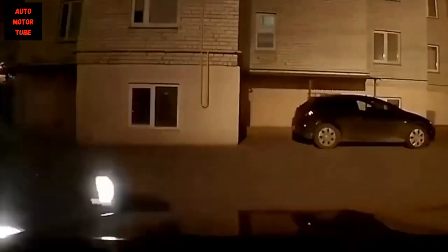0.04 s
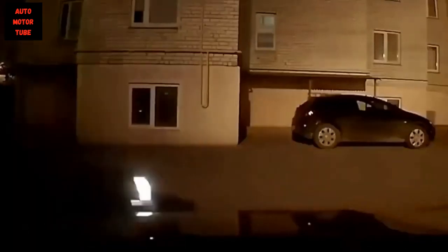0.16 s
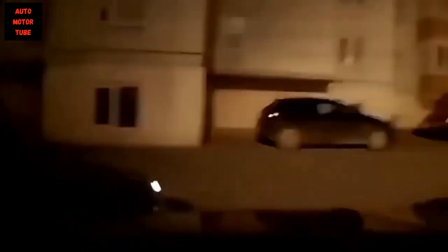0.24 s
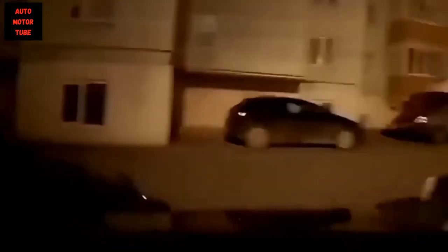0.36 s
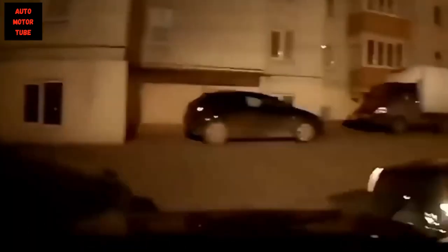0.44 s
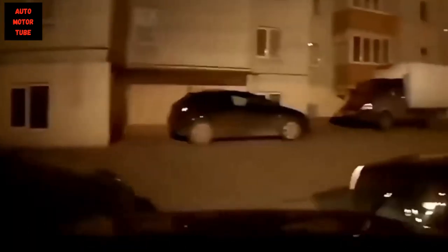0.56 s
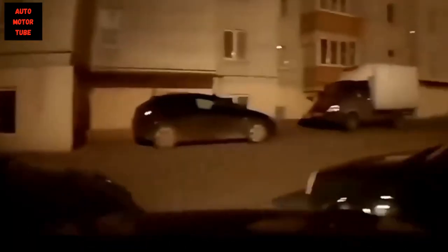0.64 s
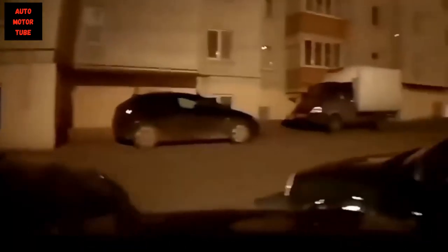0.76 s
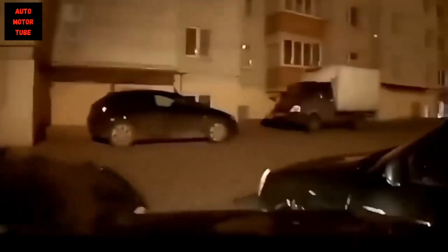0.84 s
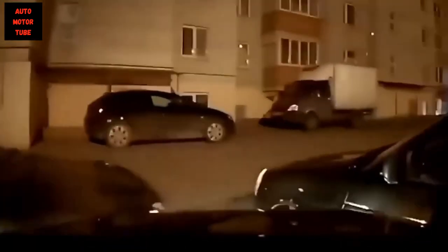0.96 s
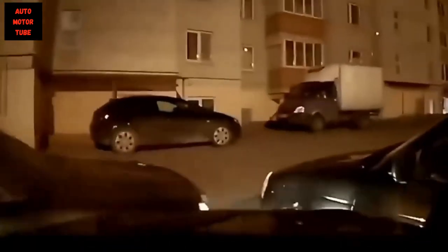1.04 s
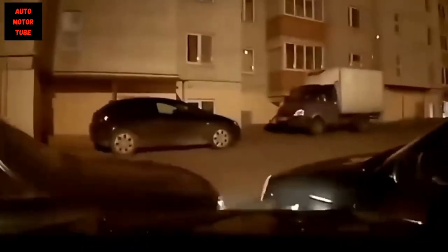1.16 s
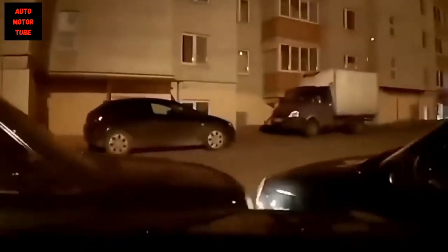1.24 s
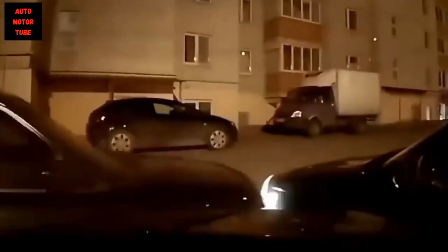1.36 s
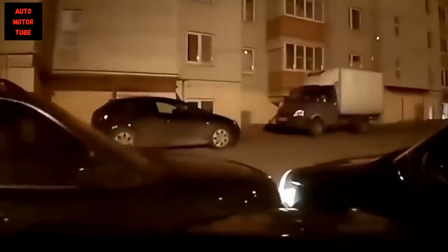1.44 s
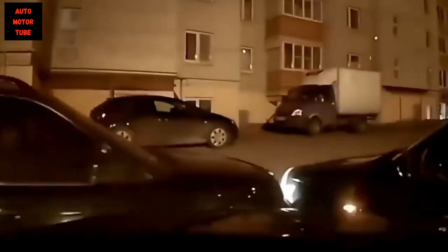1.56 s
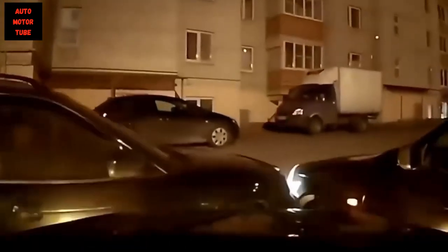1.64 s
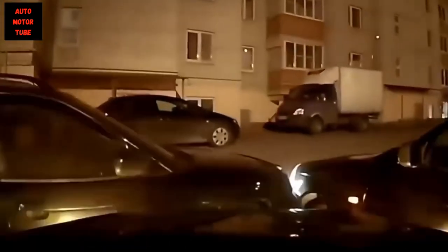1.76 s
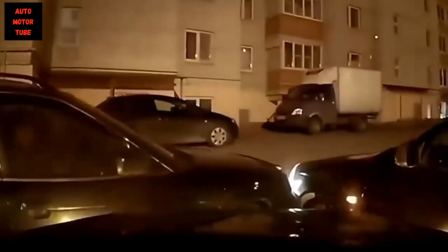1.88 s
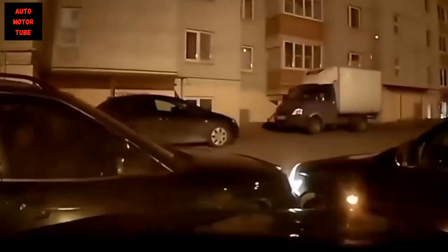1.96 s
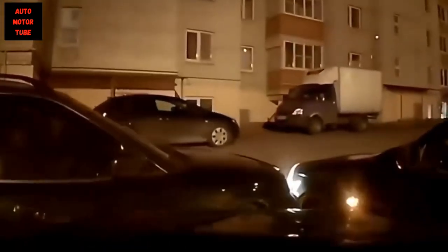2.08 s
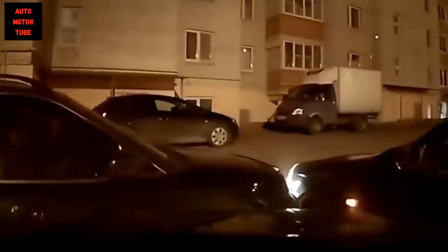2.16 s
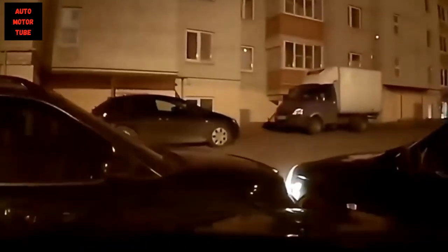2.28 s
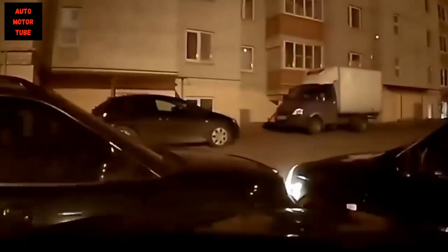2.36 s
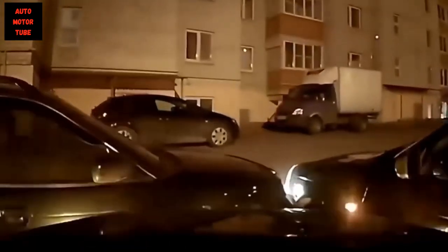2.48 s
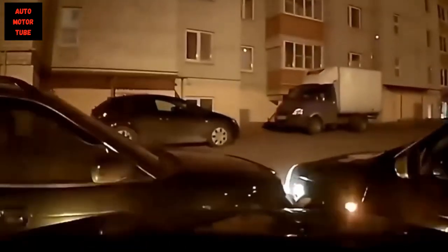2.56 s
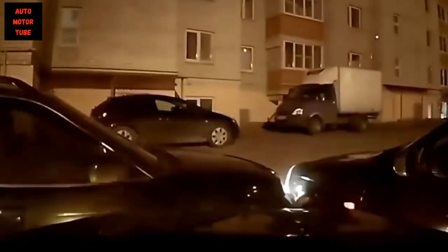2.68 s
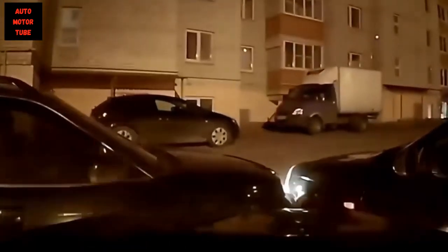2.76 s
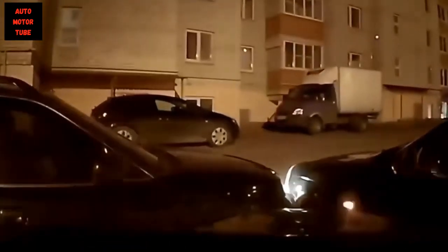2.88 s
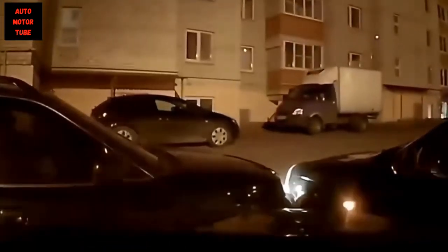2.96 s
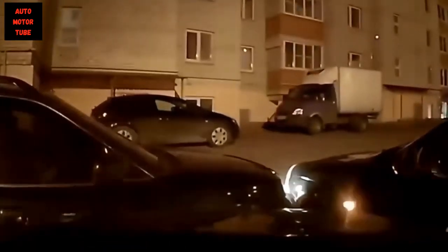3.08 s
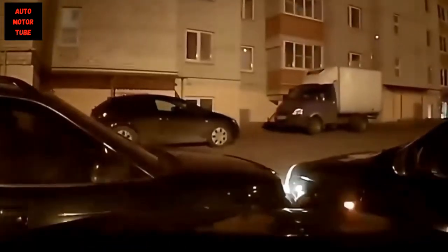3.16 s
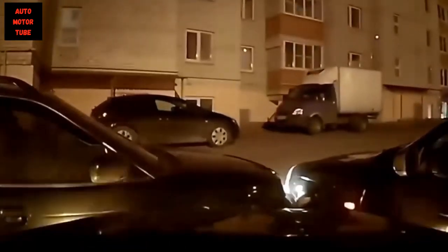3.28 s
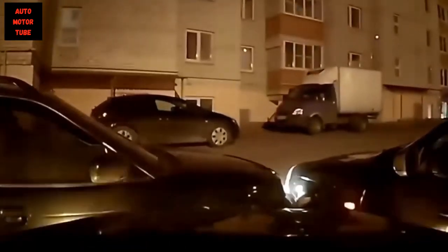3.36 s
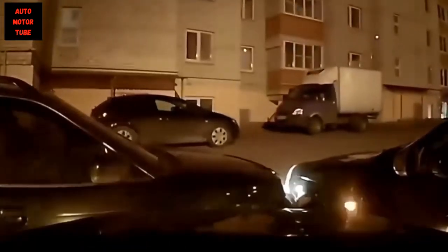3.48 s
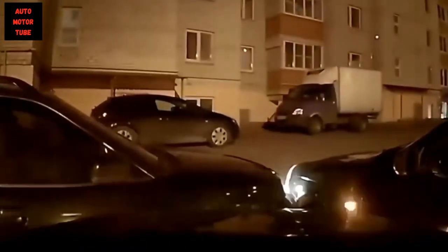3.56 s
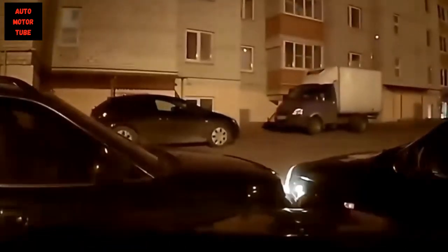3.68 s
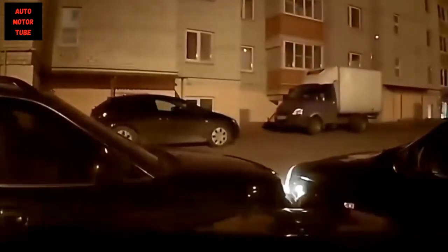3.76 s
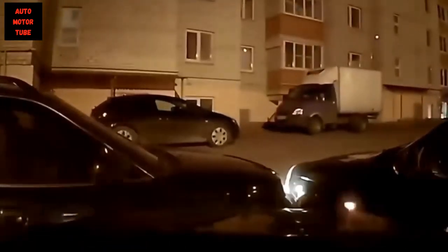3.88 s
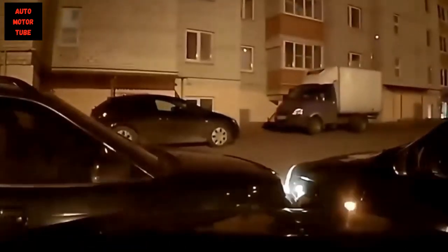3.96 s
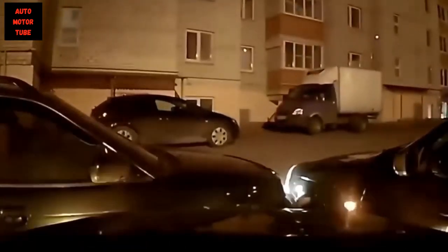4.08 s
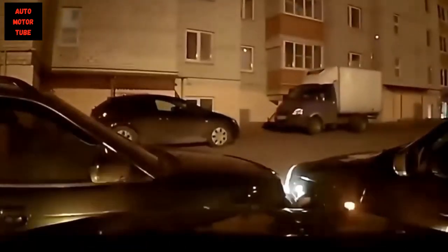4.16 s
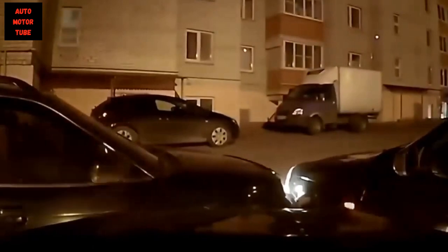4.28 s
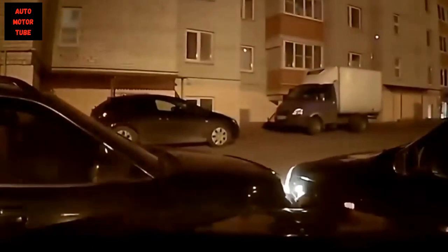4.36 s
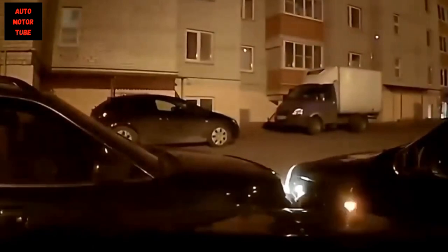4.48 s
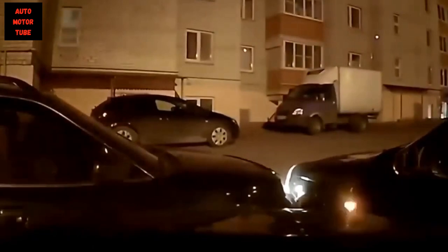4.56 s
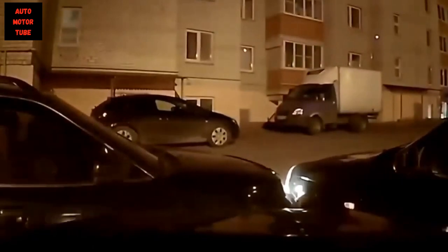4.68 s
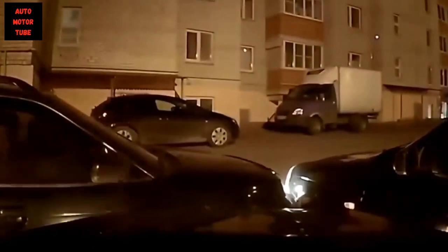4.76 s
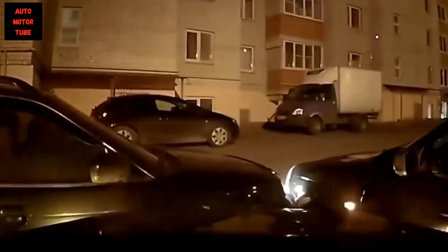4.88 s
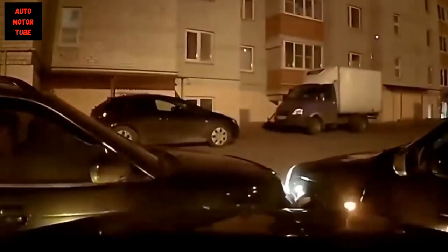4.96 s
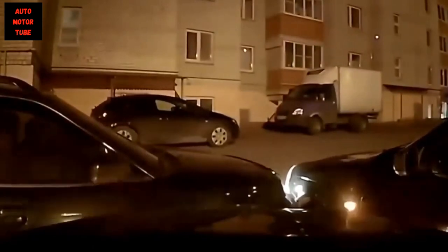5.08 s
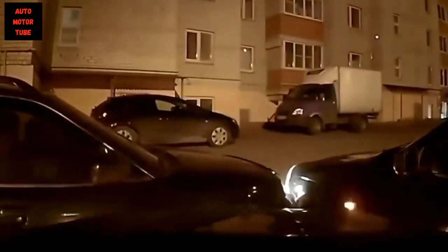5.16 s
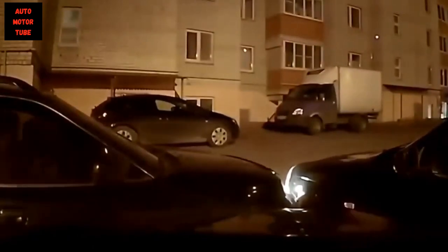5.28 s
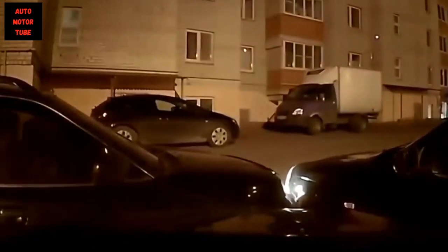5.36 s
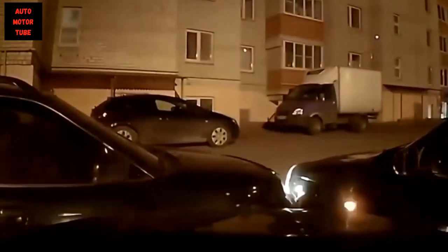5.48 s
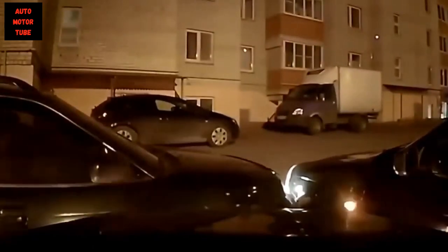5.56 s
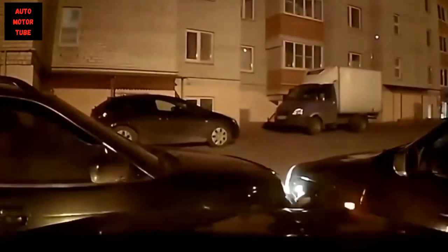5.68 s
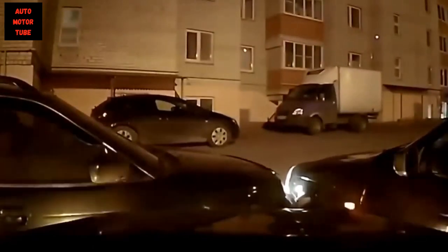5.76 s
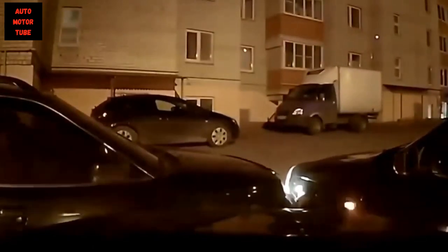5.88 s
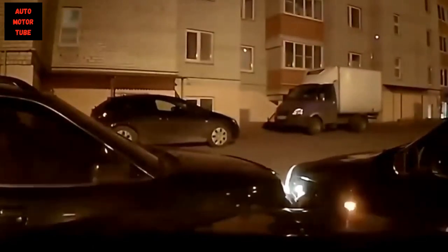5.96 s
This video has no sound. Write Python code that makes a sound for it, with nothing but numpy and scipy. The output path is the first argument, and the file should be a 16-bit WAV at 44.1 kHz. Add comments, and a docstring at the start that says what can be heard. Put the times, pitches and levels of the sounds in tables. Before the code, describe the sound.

A small in-car microphone picks up a hushed night street, then a huge close crash as another car hits. The cabin booms, metal buckles, trim snaps and rattles, tyres drag with a thin whistle, and a second strong low thump lands about a second later. Creaks and small knocks die away quickly. What remains is low rumble, faint hiss and a very soft, regular relay clicking.

```python
"""A low rumble and faint hiss of a night street, then a parked car is rammed and shoved sideways.
Its body booms, panels buckle and groan, trim cracks and rattles, tyres squeal; then a hazard relay ticks.
A small camera inside the cabin hears it. Shaped noise makes the street, crumpling and rattle;
sine swings make the boom and groan; fading rings make the blows; noise and sines mix in the cracks,
squeals and relay."""
import sys
import numpy as np
from scipy import signal
from scipy.fft import rfft, irfft, next_fast_len
from scipy.io import wavfile
from scipy.ndimage import uniform_filter1d

SR = 44100
rng = np.random.default_rng(int(sys.argv[2]) if len(sys.argv) > 2 else 0)


def store_wav(level_fs):
    """Save 16-bit WAV to argv[1]."""
    pcm = np.round(np.clip(np.atleast_2d(level_fs), -1, 1) * 32767)
    wavfile.write(sys.argv[1], SR, pcm.T.astype(np.int16))


N = 265482  # length in samples


def amp(db):
    """Turns decibels into a plain multiplier."""
    return 10 ** (np.asarray(db) / 20)


def evened(x):
    """Scales a sound to an average (rms) strength of 1."""
    return x / np.sqrt(np.mean(x ** 2) + 1e-20)


def steady(x, seconds):
    """Evens out the slow level of x, keeping its fine grain."""
    return x / np.sqrt(abs(uniform_filter1d(x ** 2, round(seconds * SR))) + 1e-20)


def along(rows, column):
    """Draws a table column as a curve over every sample."""
    rows = np.asarray(rows)
    return np.interp(np.arange(N) / SR, rows[:, 0], rows[:, column])


def between(rows, fade):
    """A gate open from the first row to the last; fade is the share of it spent opening and closing."""
    gate = np.zeros(N)
    length = round((rows[-1][0] - rows[0][0]) * SR)
    add(gate, rows[0][0], signal.windows.tukey(length, fade))
    return gate


def colour(x, points):
    """Makes each pitch region louder or softer, following a (f/Hz, level/dB) table."""
    f, db = np.transpose(points)
    size = next_fast_len(len(x) + 4096)
    hz = np.fft.rfftfreq(size, 1 / SR)
    gain = amp(np.interp(np.log(hz + 1), np.log(f + 1), db))
    return irfft(rfft(x, size) * gain, size)[:len(x)]


def add(mix, s, sound):
    """Lays a sound into the mix, starting at s seconds."""
    part = mix[round(s * SR):][:len(sound)]
    part += sound[:len(part)]


def resonate(x, hz, width):
    """Keeps a band around the pitch hz: shifts it down to zero, smooths, and shifts it back."""
    turn = np.exp(2j * np.pi * np.cumsum(hz * np.ones(len(x))) / SR)
    r = np.exp(-np.pi * width / SR)
    return 2 * (turn * signal.lfilter([1 - r], [1, -r], x / turn)).real


def impacts(per_s, spread_db):
    """Scatters single-sample hits of uneven size at random moments."""
    size = amp(spread_db * np.minimum(rng.exponential(1, N), 4))
    return size * (rng.random(N) < per_s / SR)


def clatter(per_s, spread_db, t60):
    """Noise in clumps: many small impacts, each fading by 60 dB in t60 seconds."""
    hits = impacts(per_s, spread_db)
    power = signal.lfilter([1], [1, -amp(-120 / (t60 * SR))], hits ** 2)
    return np.sqrt(power + 1e-9) * rng.standard_normal(N)


def debris(per_s, spread_db, low_hz, high_hz, cycles):
    """Loose bits knock about: each rings a few cycles at its own pitch."""
    hits = impacts(per_s, spread_db)
    bit, t, out = rng.integers(0, 24, N), np.arange(1500) / SR, np.zeros(N)
    for k, hz in enumerate(np.geomspace(low_hz, high_hz, 24)):
        ring = np.sin(2 * np.pi * hz * t) * hz * t * np.exp(-hz * t / cycles)
        out += signal.oaconvolve(hits * (bit == k), ring / np.linalg.norm(ring))[:N]
    return evened(out)


# tone of the street's low rumble: (f/Hz, relative level/dB)
RUMBLE_TONE = [(12, -36.5), (20, 4), (127, -3), (156, -9), (251, -9.5), (313, -11.5), (495, -14.5),
               (727, -20), (827, -18), (1600, -29), (2080, -61.5), (3520, -120)]
# tone of the hiss: (f/Hz, relative level/dB)
HISS_TONE = [(1100, -31.5), (1600, -2), (2100, 0.5), (2600, 2), (3100, -2.5), (3550, -3.5), (4200, -8),
             (6900, -9.5), (7500, -11.5), (8700, -14), (11000, -50)]
# thin electrical whines: (f/Hz, level/dB)
WHINES = [(7660, -94), (7720, -91.5), (8300, -99)]
QUIET_DB, AFTER_DB = -66.7, -64.5  # rumble level before the crash starts, and from then on
HISS_UNDER_RUMBLE_DB = -16.5


def street():
    """Low night rumble that flutters, a hiss that swells in patches of time and pitch, and the whines."""
    flutter = amp(1.5 * evened(uniform_filter1d(rng.standard_normal(N), 3000)))
    rumble = evened(colour(rng.standard_normal(N), RUMBLE_TONE) * flutter)
    spectrum = signal.stft(rng.standard_normal(N), nperseg=512)[2]
    patches = uniform_filter1d(rng.standard_normal(spectrum.shape), 5, 0)
    patches = evened(uniform_filter1d(patches, 12, 1))
    hiss = signal.istft(spectrum * amp(2.0 * patches), nperseg=512)[1][:N]
    hiss = amp(HISS_UNDER_RUMBLE_DB) * evened(colour(hiss, HISS_TONE))
    whine = sum(amp(db) * steady(resonate(rng.standard_normal(N), hz, 7.4), .05) for hz, db in WHINES)
    before = np.arange(N) < WRECK_LEVELS[0][0] * SR
    return (rumble + hiss) * amp(np.where(before, QUIET_DB, AFTER_DB)) + whine


# the cabin air booms as the body rocks: (t/s, level/dB)
BOOM_LEVELS = [(0.63, -58), (0.72, -23), (0.83, -31.5), (1.06, -35), (1.18, -24.5), (1.25, -32),
               (1.41, -29), (1.49, -43), (1.58, -29), (1.7, -41), (1.77, -37), (1.82, -47), (1.86, -37),
               (1.98, -39), (2.16, -60), (2.41, -58), (2.93, -72), (3.15, -64)]
# slow heave on the springs: (t/s, level/dB)
HEAVE_LEVELS = [(0.63, -55), (0.71, -15), (0.8, -29), (0.95, -33), (1.1, -39), (1.5, -36), (1.75, -41),
                (1.92, -35), (2.2, -52), (2.6, -65), (3.15, -78)]
# tone of the shaking body's broad rush: (f/Hz, relative level/dB)
RUSH_TONE = [(30, -20), (80, 0), (150, -5), (700, -18), (12000, -38)]
BOOM_HZ, HEAVE_HZ = 52, 29
RUSH_DB = -12.5  # against the boom


def boom():
    """The cabin air swings low, wavering in pitch, with a broad rush, over a slower heave."""
    waver = 1 + .09 * evened(uniform_filter1d(rng.standard_normal(N), 1500))
    swing = np.sqrt(2) * np.sin(2 * np.pi * np.cumsum(BOOM_HZ * waver) / SR)
    heave = resonate(resonate(rng.standard_normal(N), HEAVE_HZ, 18), HEAVE_HZ, 18)
    heave = steady(heave, .12) * amp(along(HEAVE_LEVELS, 1))
    rush = amp(RUSH_DB) * evened(colour(rng.standard_normal(N), RUSH_TONE))
    return ((swing + rush) * amp(along(BOOM_LEVELS, 1)) + heave) * between(BOOM_LEVELS, .02)


# the wreck in motion: (t/s, panel crumpling level/dB, trim rattle level/dB, grit and shards level/dB)
WRECK_LEVELS = [(0.63, -64, -74, -107), (0.65, -28, -41, -86), (0.68, -12.5, -24, -61),
                (0.705, -11.5, -20, -45), (0.75, -27.5, -38.5, -39), (0.96, -39, -45, -56),
                (1.02, -35, -31, -42), (1.07, -32, -43, -52), (1.15, -37, -36, -59), (1.17, -25, -43, -58),
                (1.23, -38, -35, -52), (1.3, -30, -38, -58), (1.38, -40, -41, -41), (1.43, -40, -58, -75),
                (1.51, -33, -47, -70), (1.55, -33, -51, -82), (1.57, -29, -35, -67), (1.6, -25, -43, -41),
                (1.67, -40, -54, -70), (1.75, -40, -58, -74), (1.84, -26, -48, -76), (2.02, -52, -61, -82),
                (2.13, -40, -60, -86), (2.27, -50, -63, -80), (2.31, -54, -64, -64), (2.39, -59, -65, -63),
                (2.44, -56, -70, -83), (2.96, -68, -86, -103), (3.0, -58, -82, -96), (3.15, -66, -84, -95)]
# tone of crumpling panels: (f/Hz, relative level/dB)
PANEL_TONE = [(35, -17), (60, 1), (92, -12.5), (129, -4), (204, -8), (255, -3), (368, -10), (763, -20.5),
              (921, -23.5), (1000, -23.5), (1300, -50), (2200, -120)]
# tone of rattling trim, also used by the cracks: (f/Hz, relative level/dB)
TRIM_TONE = [(290, -29), (500, -0.5), (638, -9), (922, -5), (1030, -6), (1250, -9.5), (1640, -12),
             (2440, -8), (3080, -9), (3530, -13.5), (4300, -18.5), (5590, -45.5), (9460, -120)]
# tone of grit and shards, also used by the cracks: (f/Hz, relative level/dB)
GRIT_TONE = [(2350, -28), (4000, 3), (4930, -1.5), (5330, 1), (5730, 1), (6380, -2.5), (6920, 1),
             (7740, -7.5), (8730, -30), (11300, -56), (19200, -120)]


def wreck():
    """Crowds of tiny impacts make crumpling, rattle and grit, each under its own level."""
    rattle = evened(clatter(220, 3.6, .05)) + .4 * debris(1200, 2.6, 600, 4200, 3.0)
    grit = evened(clatter(200, 4.7, 0.032)) + .4 * debris(1300, 4.5, 4300, 8000, 4.5)
    layers = [steady(colour(clatter(160, 5.3, .08), PANEL_TONE), 0.056),
              steady(colour(rattle, TRIM_TONE), 0.12),
              steady(colour(grit, GRIT_TONE), 0.085)]
    total = sum(x * amp(along(WRECK_LEVELS, k + 1)) for k, x in enumerate(layers))
    return between(WRECK_LEVELS, 0.013) * total


# the first panel folds; its groan rises, then drops: (t/s, f/Hz, level/dB)
FOLD_GROAN = [(0.640, 120, -43), (0.655, 122, -22.5), (0.68, 180, -21), (0.700, 307, -10),
              (0.715, 350, -5.5), (0.724, 260, -26.5), (0.740, 182, -17), (0.76, 150, -36.5)]


def fold():
    """One big panel swings as it folds: a sine whose pitch glides and wobbles."""
    wobble = 1 + .12 * evened(uniform_filter1d(rng.standard_normal(N), 150))
    swing = np.sin(2 * np.pi * np.cumsum(along(FOLD_GROAN, 1) * wobble) / SR)
    return np.sqrt(2) * swing * amp(along(FOLD_GROAN, 2)) * between(FOLD_GROAN, 0.073)


# cracks and knocks of trim, plus one bright click at 1.992 s that makes the relay's first tick stronger: (t/s,
# knock level/dB, f/Hz, splinter level/dB over the knock, snap 0-1)
CRACK_EVENTS = [(0.6474, -43, 2400, -32, 0.5), (0.6638, -32.5, 2560, -30, 0.72),
                (0.6736, -29, 2900, -10, 0.58), (0.7014, -28, 2610, 0, 0.5), (0.7494, -29, 2280, -1, 0.53),
                (0.765, -28, 1540, -7, 0.06), (0.779, -31.5, 2370, -1, 0.56), (0.8139, -38, 2280, -5, 0.92),
                (0.849, -31.5, 2480, -6.5, 0.7), (0.858, -30, 2510, 0, 0.3),
                (0.8819, -28, 1490, -13.5, 0.05), (0.9443, -37, 2160, -8, 0.05),
                (0.9675, -35, 2260, -11.5, 0.87), (1.0012, -36, 3015, 0.6, 0.97),
                (1.0154, -34, 3090, 1.5, 0.05), (1.035, -36, 1390, -14, 0.87),
                (1.0805, -35.5, 2260, 0.6, 0.69), (1.0942, -34, 2500, -20.5, 0.4),
                (1.129, -47.5, 2270, 6, 0.4), (1.1581, -30, 2520, -6.5, 0.5), (1.2131, -49, 2460, 0, 0.4),
                (1.2299, -41.5, 2980, 11, 0.3), (1.2444, -44, 2540, 1, 0.7), (1.2859, -40, 2830, -19, 0.9),
                (1.3445, -30.5, 2580, -3.5, 0.36), (1.3728, -36, 2644, -6, 0.83),
                (1.487, -40.5, 2860, -28, 0.2), (1.5435, -48.5, 1740, -30, 0.67),
                (1.5658, -28, 1340, -27, 0.6), (1.5988, -35.5, 1220, -2.5, 0.5),
                (1.7117, -36.5, 2380, -10.5, 0.86), (1.785, -56, 2150, -16, 0.7),
                (1.8117, -48, 1660, -32, 0.3), (1.8262, -36.5, 2660, -36, 0.65),
                (1.8395, -35.5, 2726, -29, 0.37), (1.992, -57, 2300, 3, 0.1),
                (2.1428, -54, 1220, -29, 0.83), (2.1774, -57.5, 2690, -33, 0.7),
                (2.2184, -60, 2120, -13, 0.4), (2.2468, -58.5, 2630, -20.5, 0.5),
                (2.2975, -58, 2900, -1.5, 0.6), (2.347, -55.5, 1340, -2.5, 0.8),
                (2.3632, -53, 1510, -12, 0.1), (2.4399, -67, 2250, -13, 0.8), (2.4534, -62, 1280, -17, 0.6),
                (2.4897, -65, 2220, -17, 0.7), (2.5237, -67, 2370, -8, 0.57),
                (2.597, -66.5, 2240, -10.5, 0.6), (2.9758, -63, 2820, -25.5, 0.6)]
SPLINTER_HZ, SPLINTER_SPREAD = 4850, .05  # usual pitch; random spread as a share of it
FAINT_DB, RISE_HZ_PER_DB = -50, 190  # knocks fainter than this come from smaller bits, which splinter higher


def cracks():
    """A sharp snap, with splintering noise around a low and a high pitch dying away."""
    out, t = np.zeros(N), np.arange(round(.15 * SR)) / SR
    quick = t / .0008 * np.exp(-t / .0008)
    tail = amp(-60 * t / 0.078) * (1 - np.exp(-t / 0.0027))
    for s, db, hz, bright_db, snap in CRACK_EVENTS:
        bright_hz = SPLINTER_HZ + RISE_HZ_PER_DB * np.clip(FAINT_DB - db, 0, 15)
        bright_hz *= np.exp(SPLINTER_SPREAD * rng.standard_normal())
        a, b, c, d = rng.standard_normal((4, len(t)))
        knock = evened(colour(a, TRIM_TONE)) + .9 * evened(resonate(resonate(c, hz, 600), hz, 600))
        splinter = evened(colour(b, GRIT_TONE)) + .6 * evened(resonate(d, bright_hz, 500))
        noise = tail * (knock + amp(bright_db) * splinter)
        low_ping = .6 * np.sin(2 * np.pi * hz * t)
        high_ping = amp(bright_db) * 0.9 * np.sin(2 * np.pi * bright_hz * t)
        sharp = 16 * np.clip(snap, 0, 1) ** 2 * quick * (low_ping + high_ping)
        add(out, s, amp(db) * (noise + sharp))
    return out


# a tyre dragged over asphalt: (t/s, f/Hz, level/dB)
TYRE_DRAG = [(0.74, 1050, -52), (0.79, 1070, -42), (0.85, 1005, -41.5), (1.0, 1030, -40), (1.06, 1022, -47),
             (1.13, 1068, -34.5), (1.18, 995, -36.5), (1.22, 1006, -33.5), (1.30, 1020, -34.5),
             (1.33, 1038, -43), (1.43, 1040, -51)]
# short squeaks of rubbing parts: (t/s, length/s, f/Hz, level/dB)
SQUEAK_EVENTS = [(0.785, 0.054, 6800, -43.5), (0.932, 0.031, 2300, -45), (1.645, 0.055, 3210, -48),
                 (1.922, 0.11, 2083, -56), (2.040, 0.075, 2144, -64)]


def squeals():
    """Stick-slip whistles: two tyres, one a little higher, and the short squeaks of rubbing parts."""
    noise, hz = rng.standard_normal((2, N)), along(TYRE_DRAG, 1)
    fuzz = steady(resonate(resonate(noise[0], hz, 90), hz, 90), 0.021)
    other_tyre = evened(resonate(resonate(noise[1], 1.13 * hz, 60), 1.13 * hz, 60))
    waver = 1 + 0.0068 * evened(uniform_filter1d(noise[0], 400))
    turns = np.cumsum(hz * waver) / SR
    whistle = 0.92 * np.sin(2 * np.pi * turns) + .15 * np.sin(4 * np.pi * turns)
    tyres = whistle + .35 * fuzz + 0.25 * other_tyre
    out = tyres * amp(along(TYRE_DRAG, 2)) * between(TYRE_DRAG, 0.038)
    for s, length, hz, db in SQUEAK_EVENTS:
        rub = rng.standard_normal(8000)[:round(length * SR)]
        squeak = steady(resonate(resonate(rub, hz, 110), hz, 110), .03)
        add(out, s, amp(db) * squeak * signal.windows.tukey(len(rub), .4))
    return out


# dull blows through the body: (t/s, level/dB, f/Hz, shaken parts level/dB against the blow)
THUD_EVENTS = [(0.752, -14.5, 131, -8), (0.853, -26, 305, -1.5), (1.035, -22, 276, -9.5),
               (1.088, -24, 148, -5.5), (1.156, -23, 377, 0), (1.288, -29, 416, -2), (1.45, -23, 138, -14),
               (1.564, -9.5, 123.6, -13), (1.593, -16.5, 125.2, -22), (1.784, -24, 81, -12),
               (1.818, -25, 116, -14.5), (1.843, -17, 120.3, -14.5), (1.899, -23, 188.6, -19),
               (2.069, -40, 206, -8.5), (2.13, -33, 427, -6.5), (2.308, -43, 256, -5.5),
               (2.354, -52, 330, 2.5), (2.449, -44.5, 204, -0.5), (2.672, -54, 266, -7),
               (2.988, -48, 251, -19.5), (3.052, -50, 177, -13.5), (3.98, -45, 146, -17.5),
               (4.294, -52.5, 157, -18), (5.698, -51, 162, -17), (5.82, -56, 411, -6.5)]
THUD_T60_S = .145  # time to fade by 60 dB
SHAKE_HZ, SHAKE_SPREAD = 430, .14  # usual pitch of the shaken parts; random spread as a share of it


def thuds():
    """Each blow rings a low panel and shakes the parts around it."""
    out, t = np.zeros(N), np.arange(round(.3 * SR)) / SR
    for s, db, hz, shake_db in THUD_EVENTS:
        shake_hz = SHAKE_HZ * np.exp(SHAKE_SPREAD * rng.standard_normal())
        shake = evened(resonate(resonate(rng.standard_normal(len(t)), shake_hz, 240), shake_hz, 240))
        ring = np.sin(2 * np.pi * hz * t) + amp(shake_db) * shake
        fade = amp(db - 60 * t / THUD_T60_S) * (1 - np.exp(-t / .003))
        add(out, s, fade * ring)
    return out


# ringing of the relay housing: (f/Hz, relative level/dB, time to fade by 60 dB t/s)
TICK_RINGS = [(890, -4.5, 0.069), (1118.5, -4.5, 0.074), (2826, 3, 0.031), (3850, 1.5, .045)]
TOCK_RINGS = [(902, -4.5, 0.059), (1031, -7.5, 0.095), (6250, -21, 0.018)]
# lower and treble tone of the relay's chatter: (f/Hz, relative level/dB)
CHATTER_TONE = [(600, -21), (1500, 2), (2200, -6.5), (2900, 4), (4000, -1.5), (4700, -29.5), (5500, -32)]
TREBLE_TONE = [(3500, -30), (4600, -6), (5400, -5), (6400, 1), (7000, -3), (7900, -3), (8700, -20),
               (11000, -50)]
# the contact closes with a tick, lets go with a tock, round and round
FIRST_TICK_S, BLINK_S, CLOSED_S = 1.9975, .7917, .395
TICK_DB, TOCK_DB = -71.5, -70
TICK_TREBLE_DB, TOCK_TREBLE_DB = -2.5, 2.5  # against the lower chatter


def relay():
    """The armature strikes and chatters for some milliseconds: a dry clack that rings its housing."""
    out, t = np.zeros(N), np.arange(round(.12 * SR)) / SR
    ticks = np.arange(FIRST_TICK_S, N / SR, BLINK_S)
    # rise and lasts in seconds; clack is the chatter's strength beside the ring
    for times, level_db, treble_db, modes, rise, lasts, clack in (
            (ticks, TICK_DB, TICK_TREBLE_DB, TICK_RINGS, .003, .011, 3.1),
            (ticks + CLOSED_S, TOCK_DB, TOCK_TREBLE_DB, TOCK_RINGS, .006, .010, .8)):
        ring = sum(amp(db - 60 * t / t60) * np.sin(2 * np.pi * hz * t) for hz, db, t60 in modes)
        ring = evened(ring * (1 - np.exp(-t / rise)))
        shape = (1 - np.exp(-t / 0.00033)) * np.exp(-(t / lasts) ** 2 / 2)
        for s in times:
            low, high = rng.standard_normal((2, len(t)))
            chatter = evened(colour(low, CHATTER_TONE)) + amp(treble_db) * evened(colour(high, TREBLE_TONE))
            add(out, s, amp(level_db) * (ring + clack * shape * chatter))
    return out


def scene():
    """Adds up all the sounds, the same in both channels."""
    mono = street() + boom() + wreck() + fold() + cracks() + squeals() + thuds() + relay()
    return np.array([mono, mono])


# overall treble tone: drops steeply above 8.5 kHz, with a faint remainder above: (f/Hz, level/dB)
TOP_TONE = [(8500, -1), (9100, -17), (9800, -28), (11000, -12.5), (12200, -25), (14000, -27.5)]
# how far the treble differs between left and right: (f/Hz, side over mid level/dB)
APART_TONE = [(2500, -91.5), (3800, -28.5), (5000, -15), (7000, -8), (8200, -2), (9000, 0), (10500, -4)]
FULL_SCALE = .45  # loud peaks bend softly toward this limit
HISS_SOURCE_DB = -98.5  # noise level before differencing, which lifts its treble
EDGE_HZ = 14700


def record(dry):
    """Loud peaks are softly bent and the treble is dulled; faint hiss joins, then the very top is cut.

    The treble differs a little between left and right, changing quickly."""
    mid = colour(FULL_SCALE * np.tanh(dry[0] / FULL_SCALE), TOP_TONE)
    quick_change = evened(uniform_filter1d(uniform_filter1d(rng.standard_normal(N), 100), 100))
    side = colour(mid, APART_TONE) * quick_change
    both = np.array([mid + side, mid - side])
    both = both + amp(HISS_SOURCE_DB) * np.diff(np.diff(rng.standard_normal((2, N + 2))))
    top_cut = signal.firwin(511, EDGE_HZ, window=("kaiser", 9), fs=SR)
    return signal.oaconvolve(both, top_cut[None], "same")


dry = scene()
out = record(dry)
store_wav(out)
```